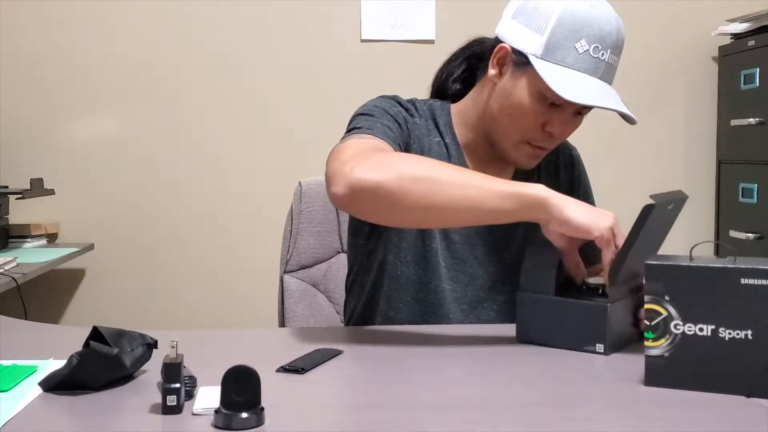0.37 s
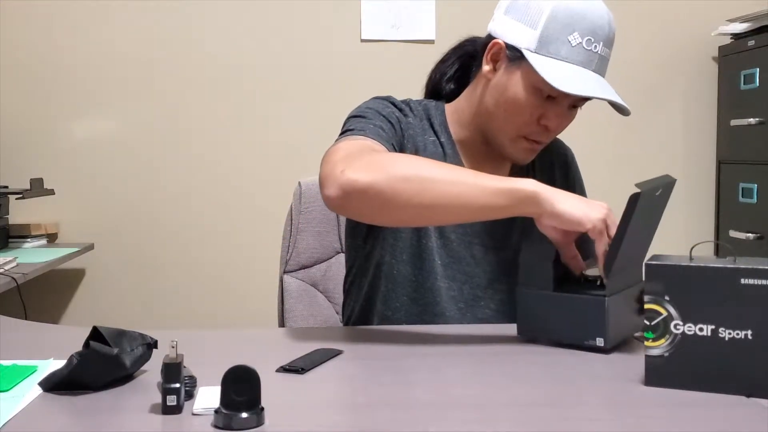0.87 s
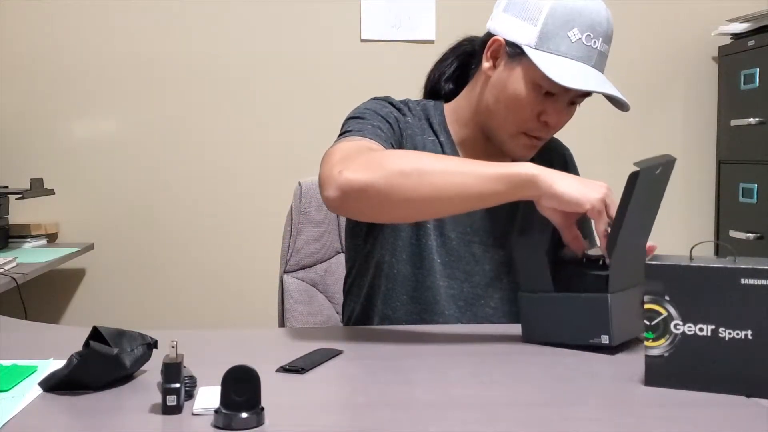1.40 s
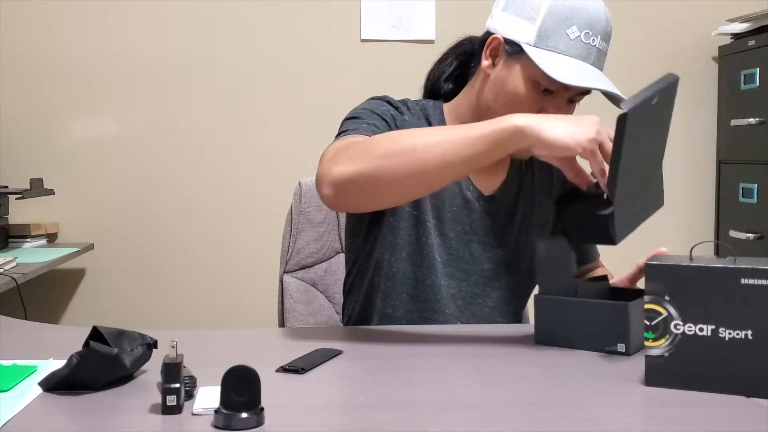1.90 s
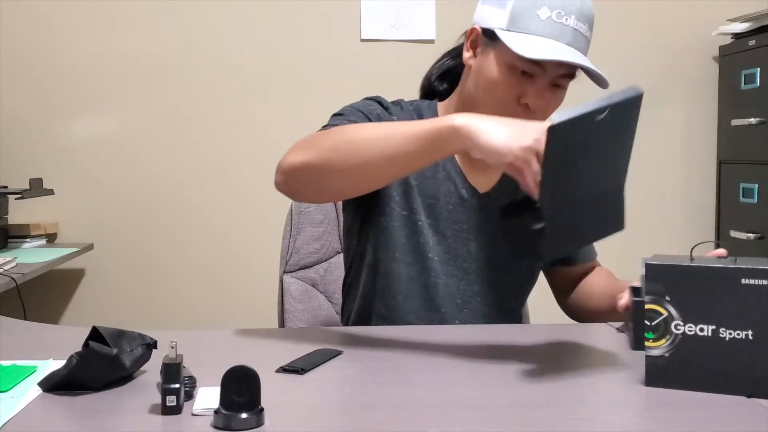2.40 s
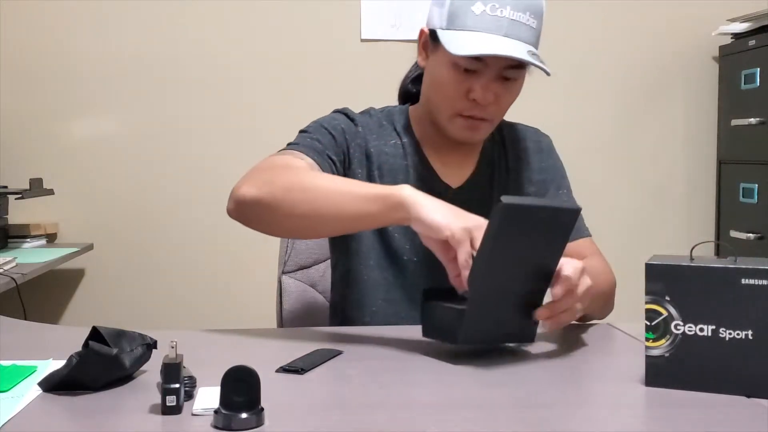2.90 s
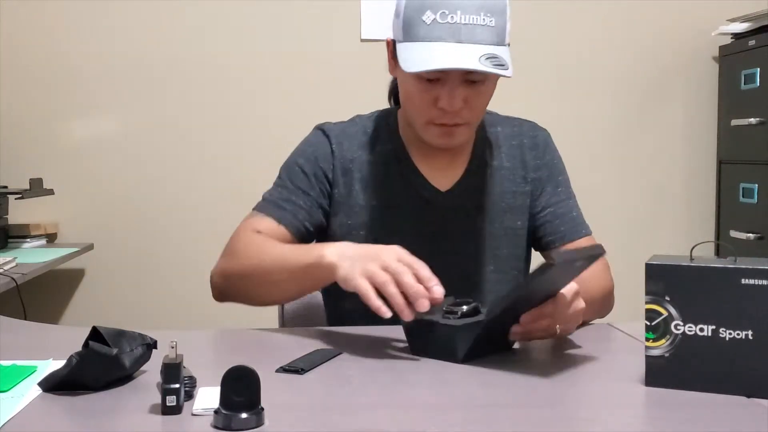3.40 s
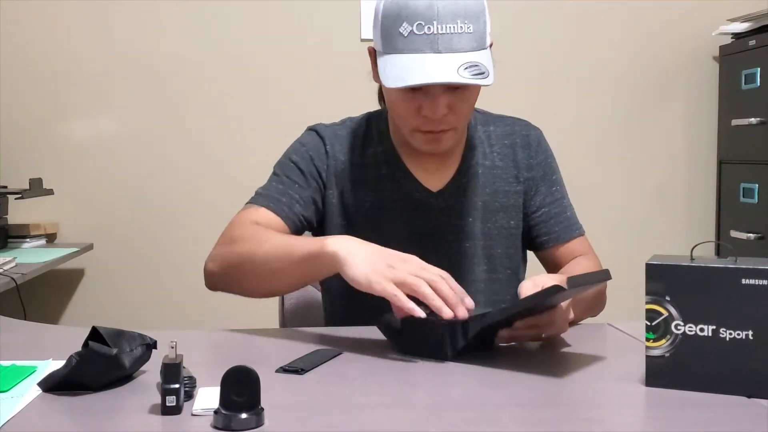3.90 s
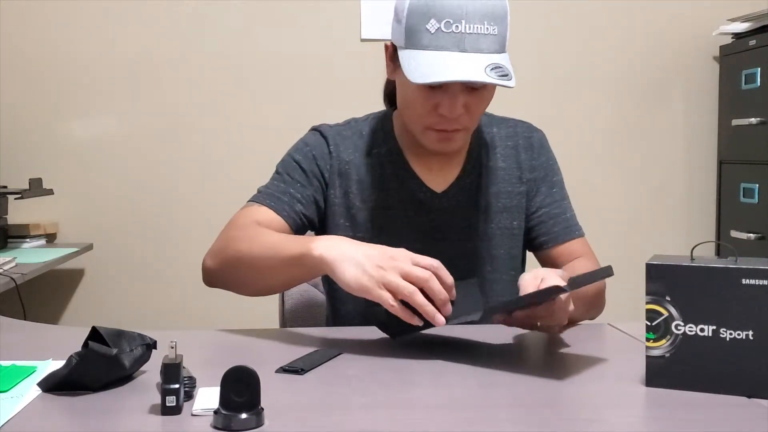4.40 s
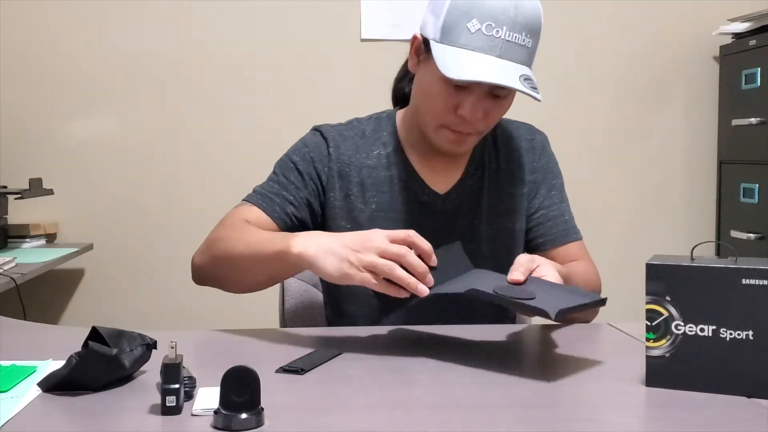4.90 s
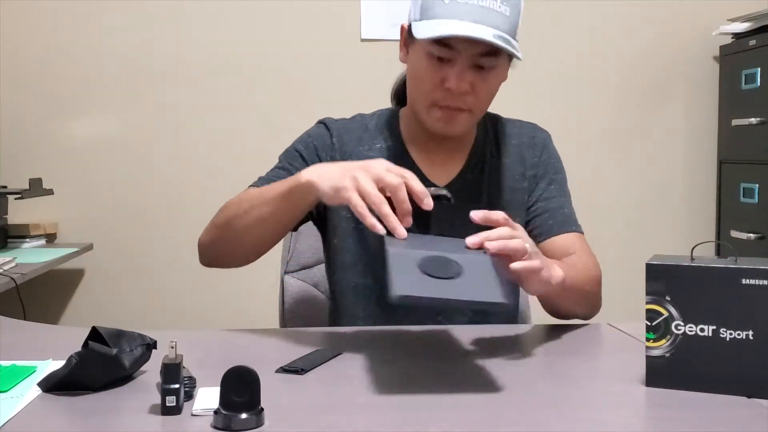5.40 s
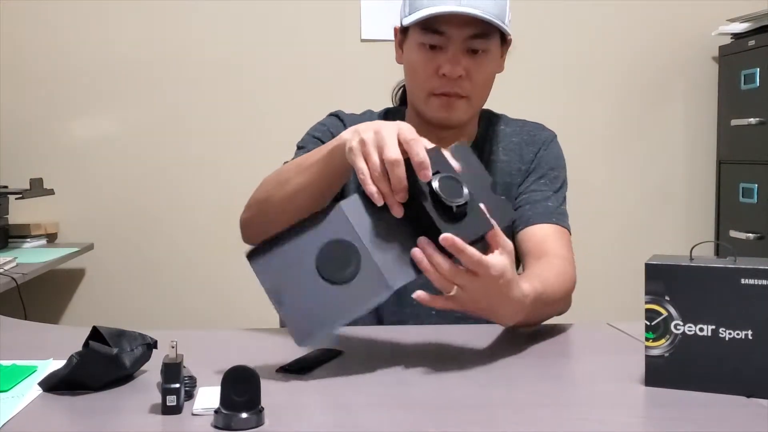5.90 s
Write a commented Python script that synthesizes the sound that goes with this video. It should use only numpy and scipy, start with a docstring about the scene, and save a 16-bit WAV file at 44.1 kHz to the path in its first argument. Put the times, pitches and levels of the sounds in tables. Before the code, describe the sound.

A small bare office heard by a stereo microphone well away from the desk: a deep, wavering machine hum, slightly right, and a faint airy floor run throughout. From 0 to 0.5 s card slides quietly with muffled low squeaks. A dull bump at 0.9 leads to a loud hollow box knock at 1.06, a softer one at 1.34 and another strong thump at 1.48. A grainy scrape with a mid-pitched squeak rises from 1.6 to 1.95, ending in clustered knocks and a crisp snap near 2.0, with short echoes. A droning-free, hissy slide swells around 2.3 and dies by 2.7. Weak knocks and ticks come at 3.05. A thin squeaky slide follows at 3.7-4.2, then sparse papery brushes and tiny bumps, small rubs from 5.1 to 5.6, and a last soft, hissy slide from 5.7 to the end.

```python
"""A small bare office, a stereo microphone far from the desk. From the start a machine hums near 53 Hz
over a faint floor of filtered noise, and card slides and squeaks: grainy noise under uneven pressure.
From 0.9 to 2.1 s hands work a cardboard tray out of its box: pushes ring the box walls, edges tick as
noise bursts, and echoes and a decaying noise tail answer each blow. Weak knocks come near 3.1 s; then
slides, brushes and faint blows, and a last slide from 5.7 s."""
import sys
import numpy as np
from scipy import signal
from scipy.fft import rfft, irfft, next_fast_len
from scipy.io import wavfile
from scipy.ndimage import map_coordinates

SR = 44100
rng = np.random.default_rng(int(sys.argv[2]) if len(sys.argv) > 2 else 0)


def voltage_ratio(decibels):
    """Convert decibels (scalar or array-like) to amplitude ratios, 20 dB per decade."""
    exponent = np.asarray(decibels, float) / 20
    return 10 ** exponent


def unload_audio(sound):
    """Save the sound as a 16-bit wav file, at the path given as the first command line argument."""
    columns = np.transpose(np.atleast_2d(sound))
    # keep every value between -1 and 1, then stretch to whole-number steps
    steps = np.round(np.clip(columns, -1, 1) * 32767)
    wavfile.write(sys.argv[1], SR, steps.astype(np.int16))


N = 266496

# long slides of card on card, one list a slide: t/s, level of the edge scrape/dB
SLIDES = [
    [(0, -75.5), (.256, -65), (.29, -71), (.398, -65.5), (.47, -82.5)],
    [(1.18, -69), (1.29, -60.5), (1.38, -63.5), (1.46, -52.5)],
    [(1.57, -54.5), (1.72, -62.5), (1.75, -56.5), (1.86, -52.5), (1.955, -57)],
    [(2.12, -65.5), (2.21, -54), (2.31, -50), (2.336, -46), (2.526, -57), (2.67, -80)],
    [(3.64, -87.5), (3.78, -65), (3.8, -63), (3.906, -58.5), (3.98, -63.5), (4.01, -62), (4.144, -73),
     (4.22, -87)],
    [(5.7, -78.5), (5.77, -68), (5.95, -69.5), (6.024, -62.5), (6.04, -67)],
]
# what touches in each slide: panel drone over the scrape/dB, fibre hiss over the scrape/dB,
# treble lean of the hiss/dB
GRIPS = [(7, 3, -3.5), (4.5, -11.5, 3), (7, -5.5, -3.5), (-18.5, 0, -0.5), (-6, -10.5, -2.5), (-5, 5, -2.5)]
# short brushes of fingers and flaps: t at full pressure/s, t of letting go/s,
# panel level/dB, edge level/dB, hiss level/dB
BRUSHES = [(0.235, 0.25, -60, -103, -89), (0.862, 0.91, -83, -86.5, -107), (1.059, 1.068, -48, -49.5, -56),
           (1.292, 1.317, -55.5, -60.5, -62), (2.701, 2.77, -88, -98, -85.5),
           (3.329, 3.46, -89.5, -79, -76), (3.554, 3.68, -90.5, -80.5, -74.5), (3.988, 4.25, -94, -86, -88),
           (4.146, 4.22, -99.5, -93, -77.5), (4.328, 4.32, -81, -79.5, -70), (4.4, 4.53, -91.5, -90.5, -81),
           (4.842, 4.937, -86, -80.5, -61.5), (5.125, 5.22, -78, -80, -72),
           (5.256, 5.3, -70.5, -67.5, -64.5), (5.379, 5.42, -81, -77, -61.5), (5.519, 5.55, -81, -70, -64),
           (5.605, 5.65, -79.5, -67.5, -65.5)]
FALL_DB_PER_S = 189  # how fast slides, brushes and rasps fade at their end


def unit(x):
    """Scaled to rms 1."""
    return x / np.sqrt(np.mean(x ** 2) + 1e-20)


def along(points, hz):
    """Reads (f/Hz, value) points on a log frequency axis."""
    f, v = np.transpose(points)
    return np.interp(np.log(hz + 1), np.log(f + 1), v)


def wobble(rate):
    """A smooth random curve, rate knots a second."""
    knots = rng.standard_normal(int(N * rate / SR) + 4)
    return map_coordinates(knots, [np.arange(N) * rate / SR])


def filtered(x, response):
    """x times a complex response of frequency."""
    m = next_fast_len(x.shape[-1] + 8192)
    spectrum = rfft(x, m) * response(np.fft.rfftfreq(m, 1 / SR))
    return irfft(spectrum, m)[..., :x.shape[-1]]


def mode(f, hz, width):
    """One causal resonance, gain 1 at its top."""
    return 1j * f * width / (hz * hz - f * f + 1j * f * width + 1e-9)


def diffuse(pair):
    """Two unrelated signals as the two ports hear them: alike in the bass, far less so in the treble."""
    # likeness of the ports: f/Hz, left-right correlation
    likeness = [(60, 0.98), (180, 0.84), (550, 0.62), (1650, -0.1), (4970, 0.11), (15000, -0.31)]

    def mid_side(f):
        turn = np.arccos(np.clip(along(likeness, f), -1, 1)) / 2
        return np.array([np.cos(turn), np.sin(turn)])

    mid, side = filtered(pair, mid_side)
    return np.array([mid + side, mid - side])


def machine_hum():
    """A machine's hum off to the right: a sine near 53 Hz whose level and phase waver."""
    # the hum wavers: t/s, rms level before panning/dB
    hum_level = [(0.0, -63), (0.05, -56), (1.9, -55), (2.0, -62), (2.14, -55), (3.46, -57.5), (3.92, -54),
                 (4.14, -63.5), (4.25, -54), (4.56, -60.5), (4.74, -54), (5.37, -59), (5.9, -54),
                 (6.04, -59)]
    t = np.arange(N) / SR
    level_db = np.interp(t, *np.transpose(hum_level)) + .8 * wobble(9)
    phase = 2 * np.pi * 53.1 * t + .08 * wobble(5)
    hum = np.sqrt(2) * voltage_ratio(level_db) * np.sin(phase)
    return hum * voltage_ratio([[-1.5], [1.5]])


def air_floor():
    """Air noise and microphone hiss: filtered noise with a narrow peak, a little right of centre."""
    # spectrum of the floor: f/Hz, relative level per Hz/dB
    floor_shape = [(36, -29), (62, -9), (71, -15.5), (82, -23), (130, -23), (242, -37), (305, -33.5),
                   (350, -39), (450, -53), (583, -47), (1010, -53.5), (7570, -64), (13500, -55),
                   (15700, -62)]
    # narrow faint peak in the floor noise: f/Hz, width/Hz, gain added at its top, relative to the floor/dB
    floor_peak = (11550, 60, 9)
    hz, width, db = floor_peak

    def colour(f):
        return voltage_ratio(along(floor_shape, f)) * (1 + voltage_ratio(db) * np.abs(mode(f, hz, width)))

    air = filtered(diffuse(rng.standard_normal((2, N))), colour)
    return voltage_ratio(-63.5) * unit(air) * voltage_ratio([[-.8], [.8]])


def band(f, low_hz, high_hz):
    """Causal band-pass, steeper on the treble side."""
    u, v = f / high_hz, low_hz / (f + 1e-9)
    return 1 / ((1 - u * u + 1.2j * u) ** 3 * (1 - v * v - 1.4j * v) * (1 - .6j * v))


def walls(f):
    """The box walls resonate with the knocks and under the panel drone."""
    # wall resonances: f/Hz, width/Hz, relative level/dB
    wall_modes = [(328, 30, 6), (399, 11, 9.5), (412, 25, 9), (492, 28, 13), (592, 38, 11.5), (700, 39, 15),
                  (778, 45, 13.5), (878, 30, 6.5), (965, 83, 10), (1170, 40, 4.5), (1315, 40, 16),
                  (1787, 28, 15), (2120, 60, 8.5)]
    return 1 + 0.36 * sum(voltage_ratio(db) * mode(f, hz, w) for hz, w, db in wall_modes)


def room(x):
    """A fresh diffuse noise tail; each frequency dies at its own speed."""
    # decay of the room: f/Hz, t60/s
    room_decay = [(100, 0.37), (400, 0.38), (700, 0.37), (1840, 0.4), (4850, 0.16)]
    f, t, z = signal.stft(rng.standard_normal((2, SR // 2)), SR, nperseg=256)
    decay = voltage_ratio(-60 * t / along(room_decay, f)[:, None])
    tail = diffuse(signal.istft(z * decay, SR, nperseg=256)[1])
    tail *= 1 - np.exp(-np.arange(tail.shape[1]) / SR / 0.001)  # echoes take a moment to thicken
    tail = tail / np.sqrt(np.mean(np.sum(tail ** 2, 1)))
    return signal.fftconvolve(np.atleast_2d(x), tail, axes=1)


def friction(strokes, grit_db, flutter_db, shape):
    """Fibres catch and let go: dense spiky grains under uneven pressure, coloured by the grip's shape."""
    grains = rng.standard_normal((2, N)) * voltage_ratio(grit_db * rng.exponential(size=(2, N)))
    pressure = voltage_ratio(flutter_db * (wobble(25) + 1.9 * wobble(90)))
    f, t, z = signal.stft(unit(diffuse(grains) * pressure), SR, nperseg=512)
    gain = 0
    for rows in strokes:
        s, *cols = np.transpose(rows)
        db, *grip = [np.interp(t, s, c) for c in cols]
        colour = shape(f[:, None], *grip)
        # a stroke eases in over 50 ms unless it is under way at the start
        ease = np.clip((t - s[0]) / .05 + (s[0] <= 0), 0, 1) * (t <= s[-1])
        gain = gain + ease * voltage_ratio(db) * colour / np.sqrt(np.mean(colour ** 2, 0))
    return signal.istft(z * gain, SR, nperseg=512)[1][:, :N]


def touch(start, end, db, *grip):
    """One brush or rasp: the pressure builds, sags a little while it holds, then lets go."""
    rise_db_per_s, sag_db = 489, 1.5
    points = [(start - 60 / rise_db_per_s, 60), (start, 0), (end, sag_db),
              (end + 60 / FALL_DB_PER_S, 60.5 + sag_db)]
    return [(s, db - down, *grip) for s, down in points]


def drag(rows, over_db, *grip):
    """One long slide as a layer feels it, letting go at the end."""
    s, db = rows[-1]
    points = [*rows, (s + 60 / FALL_DB_PER_S, db - 60)]
    return [(s, db + over_db, *grip) for s, db in points]


def panel_drone():
    """Panels drone: friction noise in a low band, coloured by the wall resonances."""
    strokes = [drag(rows, panel_db) for rows, (panel_db, _, _) in zip(SLIDES, GRIPS)]
    strokes += [touch(start, end, db) for start, end, db, _, _ in BRUSHES]
    return friction(strokes, 1.6, 1.4, lambda f: np.abs(band(f, 190, 1150) * walls(f)))


def edge_scrape():
    """Card edges scrape: friction noise through broad resonances of the rim."""
    # card edges: f/Hz, width/Hz, relative level/dB
    rim_modes = [(1400, 350, 2), (2020, 930, 0), (2800, 340, -10), (3800, 1600, -16)]

    def rim(f):
        ringing = sum(voltage_ratio(db) * np.abs(mode(f, hz, w)) ** 2 for hz, w, db in rim_modes)
        return np.abs(band(f, 870, 5000)) * ringing

    strokes = [drag(rows, 0) for rows in SLIDES]
    strokes += [touch(start, end, db) for start, end, _, db, _ in BRUSHES]
    return friction(strokes, 0.82, 1.1, rim)


def fibre_hiss():
    """Fibres of card and skin hiss: finer friction noise, its treble leaning with the grip."""
    # spectrum of the hiss: f/Hz, relative level per Hz/dB
    fibre_shape = [(1200, -39.5), (2500, -1.5), (4500, 0), (7000, -4), (11500, 1), (14200, -6.5),
                   (15300, -26)]
    # a blow jars the tray along the wall: t at full pressure/s, t of letting go/s, hiss level/dB
    rasps = [(1.084, 1.078, -55), (1.482, 1.54, -57), (2.001, 2.04, -41), (3.061, 3.106, -66.5)]

    def nap(f, lean_db):
        return voltage_ratio(along(fibre_shape, f) + lean_db * np.tanh((f - 8000) / 5000))

    strokes = [drag(rows, hiss_db, lean_db) for rows, (_, hiss_db, lean_db) in zip(SLIDES, GRIPS)]
    for start, end, _, edge_db, db in BRUSHES:
        lean_db = -5.5 + 0.53 * (db - edge_db)  # the more it hisses over its scrape, the brighter
        strokes.append(touch(start, end, db, lean_db))
    strokes += [touch(*row, -12.5) for row in rasps]
    return friction(strokes, 0.75, 0.64, nap)


def squeaks():
    """A tight fit squeaks or chafes: one resonance glides, swells and fades; stick and slip flutter it."""
    # squeaks: start t/s, end t/s, level/dB, start f/Hz, end f/Hz, width over pitch
    squeak_table = [(0.038, 0.267, -66, 361, 410, 0.11), (0.14, 0.243, -59, 900, 796, 0.19),
                    (0.316, 0.452, -57.5, 816, 700, 0.26), (0.235, 0.327, -64, 4460, 4520, .1),
                    (0.999, 1.073, -60, 765, 782, 0.13), (1.737, 1.948, -48, 978, 994, 0.12),
                    (1.739, 1.93, -55.5, 1420, 1400, 0.089), (1.74, 1.95, -55, 1730, 1710, 0.065),
                    (2.19, 2.601, -62.5, 890, 846, .5), (2.325, 2.41, -67, 1560, 1940, 0.11),
                    (2.66, 2.8, -78.5, 2950, 2800, .14), (2.648, 2.8, -83, 4180, 4200, .3),
                    (3.713, 3.965, -70.5, 990, 693, 0.14), (3.787, 3.845, -54, 2290, 2280, .12),
                    (3.85, 3.97, -55, 1930, 1820, 0.16), (3.99, 4.14, -68, 2400, 2900, 0.32),
                    (4.07, 4.218, -77.5, 3120, 3360, 0.064), (4.07, 4.197, -65.5, 716, 728, 0.101),
                    (4.063, 4.208, -70.5, 1490, 1500, 0.073), (4.311, 4.42, -75.5, 2800, 2500, .3),
                    (4.33, 4.42, -78, 1500, 1450, .12), (5.11, 5.208, -76, 800, 900, 0.28),
                    (5.125, 5.213, -69.5, 1520, 1487, .07), (5.252, 5.319, -71, 1450, 1420, .08),
                    (5.255, 5.31, -70, 3300, 3500, .25), (5.504, 5.641, -72, 1990, 1450, .25),
                    (5.731, 5.834, -71.5, 1530, 1490, .1), (5.735, 5.859, -69.5, 330, 298, 0.84)]
    strokes = []
    for start, end, db, start_hz, end_hz, wide in squeak_table:
        strokes.append([(start - .06, db - 89.5, start_hz, wide),
                        (start + 0.0078, db, start_hz, wide),
                        (end - .02, db - 2.5, end_hz, wide),
                        (end + 0.013, db - 51.5, end_hz, wide)])

    def resonance(f, hz, wide):
        return np.abs(mode(f, hz, np.clip(wide, .04, 1) * hz)) ** 2

    return friction(strokes, 1.3, .7, resonance)


def slide():
    """Card on card and skin: drone, scrape and squeaks with fibre hiss, direct and through the room."""
    body = panel_drone() + edge_scrape() + squeaks()
    hiss = fibre_hiss()
    return body + hiss + room(voltage_ratio(-6) * body + voltage_ratio(-9) * hiss)[:, :N]


def place_blow(out, s, db, blow, room_db):
    """Places a blow by its direct peak level, with early echoes and the room's tail."""
    # desk top and near walls: delay t/s, level before the room's cut and a small scatter/dB
    early_echoes = [(.0021, -3), (.0065, -6), (0.0093, -8), (0.013, -15)]
    blow = voltage_ratio(db) * blow / np.abs(blow).max()
    wet = voltage_ratio(room_db) * room(blow)
    wet[:, :len(blow)] += blow
    for delay, echo_db in early_echoes:
        side_db = rng.normal(0, 0.29, (2, 1))  # each echo leans slightly to one side
        echo = voltage_ratio(echo_db + min(room_db, 0) + side_db) * blow
        wet[:, round(delay * SR):][:, :len(blow)] += echo
    out[:, round(s * SR):][:, :wet.shape[1]] += wet


def ticks():
    """Card edges catch and snap free: band-passed noise bursts that die by 60 dB in 4 ms."""
    # snaps: t/s, peak level/dB, lowest f/Hz, highest f/Hz, room level/dB
    tick_table = [(0.239, -52, 2400, 5500, 13.5), (1.005, -65, 600, 2970, -3), (1.076, -40, 3800, 5170, -8),
                  (1.473, -55, 2500, 5100, 21), (1.996, -27, 2450, 9000, -2), (3.033, -57, 1500, 9000, 4),
                  (3.04, -52.5, 700, 4220, 2.5), (3.073, -51.5, 2000, 4980, 0.5),
                  (3.312, -74, 1170, 6030, 13), (3.544, -54, 1361, 13960, 7.5),
                  (4.336, -70.5, 1850, 6120, 9), (2.328, -43.5, 1084, 2530, -2),
                  (5.352, -49.5, 2490, 13000, 7)]
    out, t = np.zeros((2, N + SR)), np.arange(SR // 16) / SR
    for s, db, low_hz, high_hz, room_db in tick_table:
        burst = voltage_ratio(-60 * t / .004) * rng.standard_normal(len(t))
        place_blow(out, s, db, filtered(burst, lambda f: band(f, low_hz, high_hz)), room_db)
    return out[:, :N]


def knocks():
    """Blows of box and tray: a short push rings the box walls; soft contact cuts the treble."""
    # blows: t/s, peak level/dB, lowest ringing f/Hz, contact cut-off f/Hz,
    # tilt above 450 Hz/dB per octave, room level/dB
    knock_table = [(0.881, -45, 89, 304, 3.5, -2), (1.0636, -15.5, 328, 2750, -2.5, 10),
                   (1.339, -30, 245, 1000, -7, 4.5), (1.477, -14, 420, 2260, -7.5, 7),
                   (1.971, -23.5, 1010, 2670, -3.5, 5), (1.995, -15.5, 776, 3620, -1.5, 4),
                   (2.054, -24.5, 737, 2370, 1.5, 2.5), (3.072, -43, 600, 4520, -11.5, 10),
                   (3.078, -41, 378, 594, -1, 8.5), (3.072, -41.5, 96.8, 241, 4.5, -0.5),
                   (4.03, -58.5, 255, 390, 9.5, 1.5), (4.796, -48, 98.8, 299, 6, -5.5),
                   (5.256, -54, 200, 3565, -6.5, -10), (5.405, -61, 147.5, 1500, -11, -10),
                   (2.399, -59.5, 129.5, 317, -10, 8), (5.718, -56, 159, 261, 5, 3.5)]
    out = np.zeros((2, N + SR))
    push = np.zeros(SR // 16)
    push[0] = 1
    for s, db, low_hz, cut_hz, tilt_db, room_db in knock_table:
        def ring(f):
            contact = signal.freqs(*signal.butter(6, cut_hz, analog=True), f)[1]
            soft = (1 + 1j * f / 450) ** (tilt_db / 6) * contact
            return band(f, low_hz, 1.008 * cut_hz) * soft * walls(f)

        place_blow(out, s, db, filtered(push, ring), room_db)
    return out[:, :N]


def scene():
    """Everything as it reaches the two ports of the microphone."""
    return machine_hum() + air_floor() + slide() + ticks() + knocks()


def band_limit(x):
    """A steep low-pass at the top of the band."""
    return signal.sosfilt(signal.butter(12, 15780, fs=SR, output="sos"), x)


def record(dry):
    """The two ports of the stereo microphone differ a little in colour."""
    # microphone balance: f/Hz, left minus right/dB
    port_balance = [(100, 0), (300, -1.5), (1000, .5), (8000, -.6)]
    mix = filtered(dry, lambda f: voltage_ratio(np.outer([.5, -.5], along(port_balance, f))))
    return band_limit(mix)


dry = scene()
out = record(dry)
unload_audio(out)
```